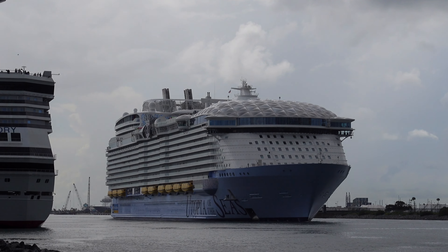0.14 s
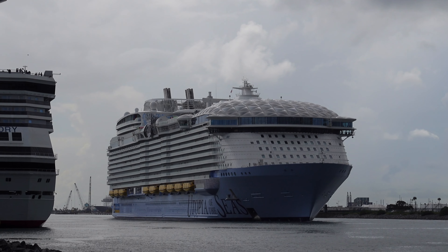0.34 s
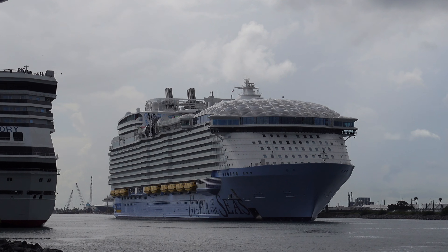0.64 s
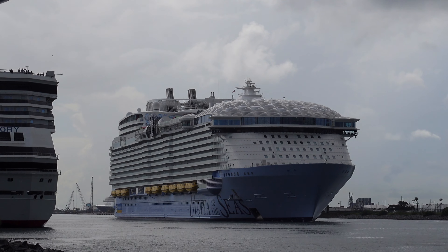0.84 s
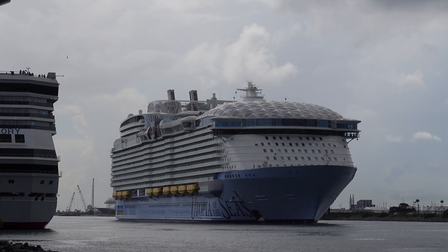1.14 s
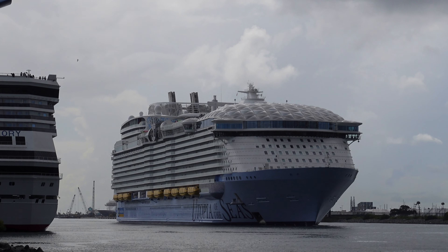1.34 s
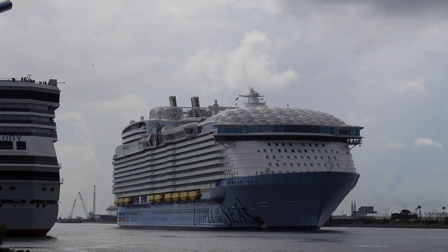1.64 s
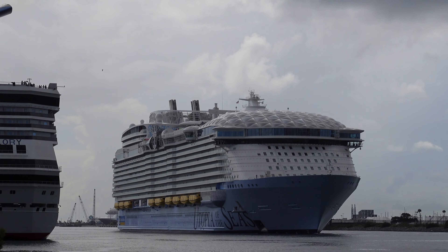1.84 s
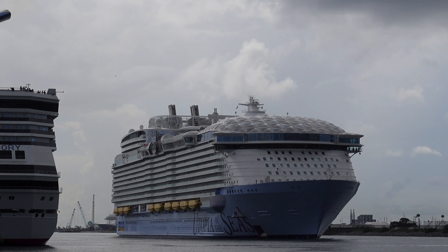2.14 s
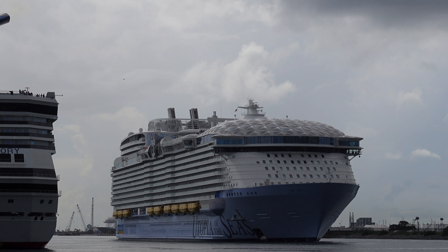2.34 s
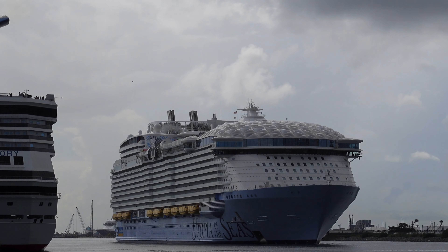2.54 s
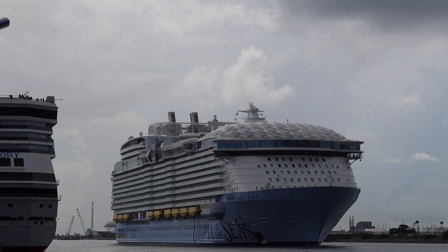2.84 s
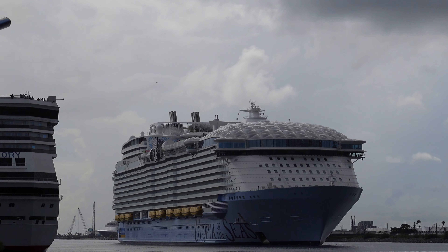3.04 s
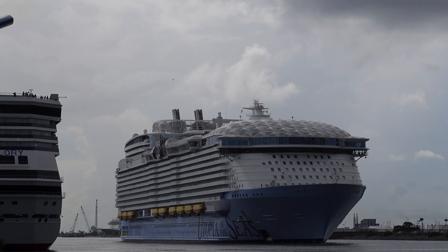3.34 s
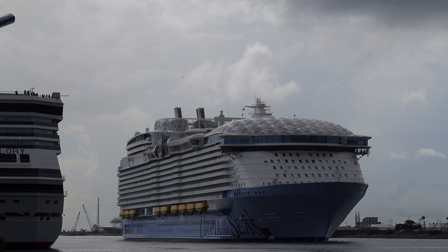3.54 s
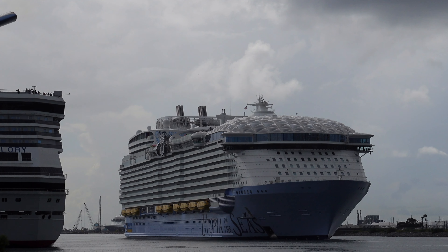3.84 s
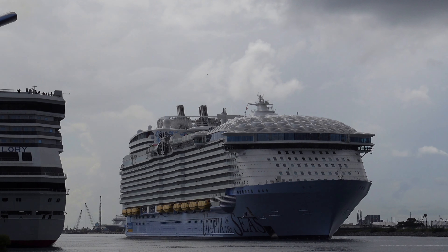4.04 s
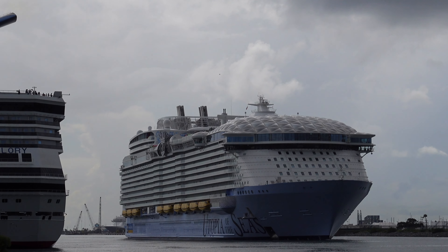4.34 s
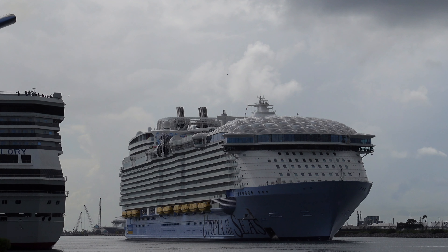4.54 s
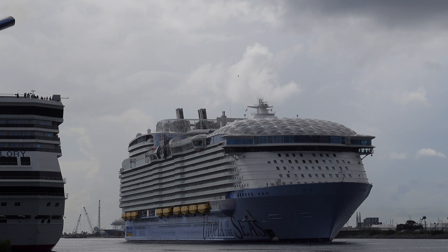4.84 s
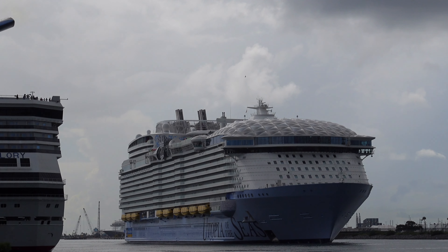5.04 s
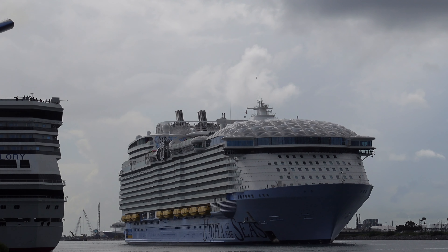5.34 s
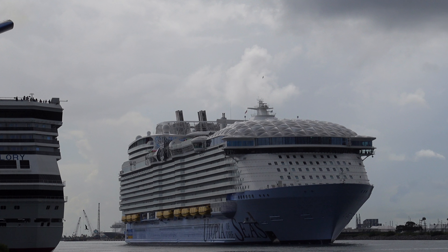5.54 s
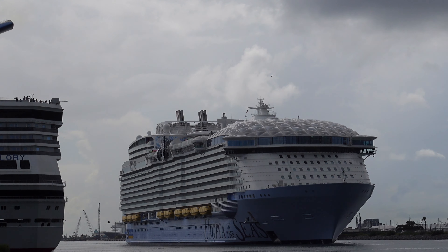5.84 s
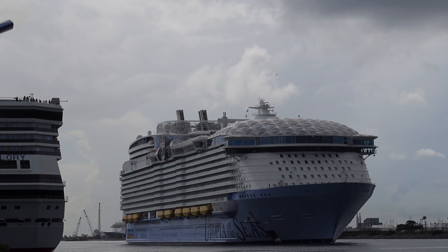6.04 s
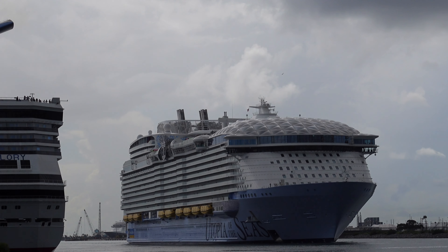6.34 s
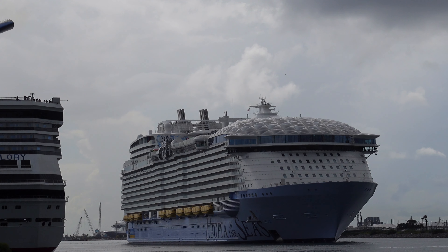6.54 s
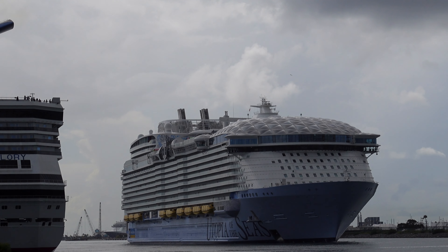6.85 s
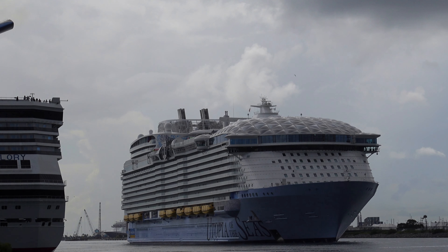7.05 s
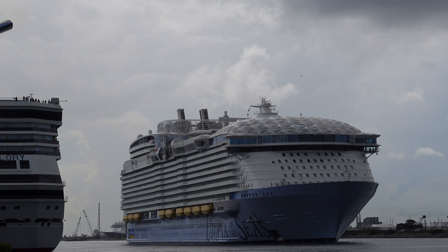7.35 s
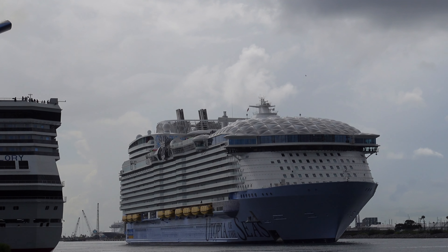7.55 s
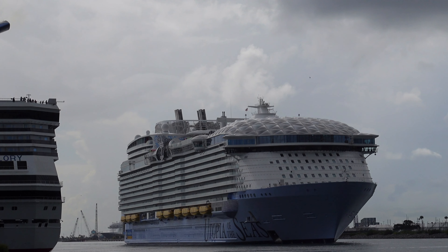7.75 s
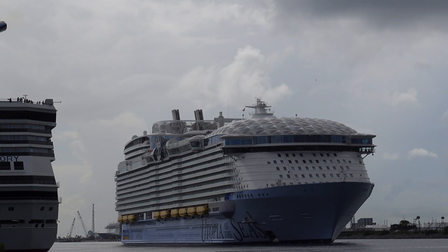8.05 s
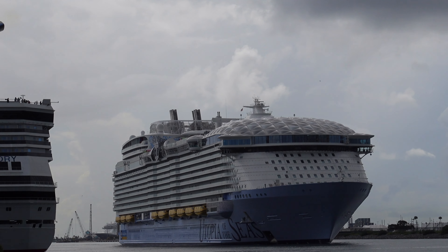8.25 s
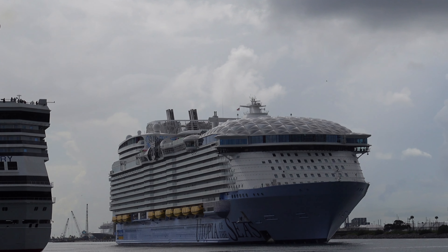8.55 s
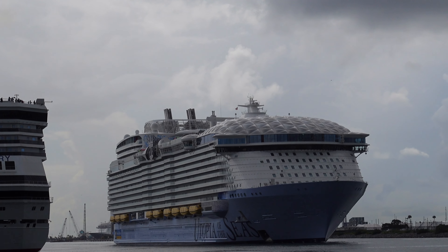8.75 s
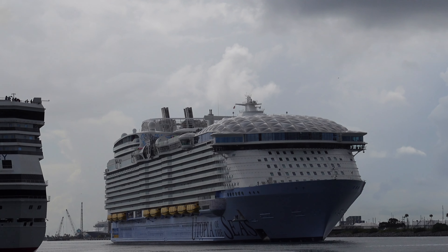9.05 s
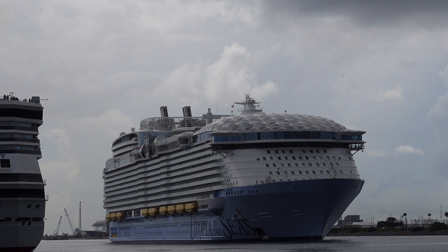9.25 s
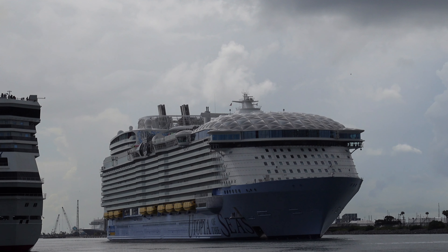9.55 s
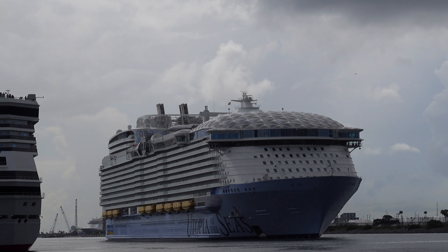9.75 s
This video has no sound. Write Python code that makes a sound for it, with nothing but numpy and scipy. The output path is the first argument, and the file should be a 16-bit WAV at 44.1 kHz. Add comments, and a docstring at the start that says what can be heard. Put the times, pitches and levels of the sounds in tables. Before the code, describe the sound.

Two very long, low, buzzing ship horn blasts roll over a harbour, separated by a short gap of gusty wind rumble and faint ticks.

```python
"""Across a harbour, far from the microphone, a large ship sounds two long blasts on its air horns.
The main horn is a train of shock pulses that arrives over several shifting paths.
A deeper horn and a weak third one sound with it; the deep horn and the main boom breed sum tones.
Air rushes through the horns, hulls and quays echo them, and faint ticks fall between the blasts.
Overload crackles late in the first blast; wind buffets the microphone over a soft harbour noise."""
import sys
import numpy as np
from scipy import signal
from scipy.fft import rfft, irfft, next_fast_len
from scipy.io import wavfile

SR = 44100
rng = np.random.default_rng(int(sys.argv[2]) if len(sys.argv) > 2 else 0)


def to_wav(sig):
    """Store sig (one row per channel, or 1-D mono) as 16-bit WAV at the path in sys.argv[1].

    Samples outside -1..1 are clipped; the rate is SR.
    """
    pcm = np.clip(np.atleast_2d(sig), -1, 1) * 32767
    pcm = np.round(pcm).astype(np.int16)
    wavfile.write(sys.argv[1], SR, pcm.T)  # frames by channels


N = 436590  # samples, about 9.9 s
MAIN_HZ, DEEP_HZ, SMALL_HZ = 91.49, 70.53, 111.8  # pulse rates of the three horns


def from_db(db):
    """Decibels to gain."""
    return 10 ** (np.asarray(db) / 20)


def rms_one(x):
    """Scale to unit power."""
    return x / np.sqrt(np.mean(x ** 2) + 1e-20)


def in_time(rows):
    """Each column of a curve at every sample."""
    s, *columns = np.transpose(rows)
    return [np.interp(np.arange(N) / SR, s, column) for column in columns]


def swings(blasts):
    """How far each level of the blasts lies above or below its mean, in dB."""
    return [db - db.mean() for db in in_time(np.vstack(blasts))]


def at_hz(points, hz):
    """Read a spectrum on a log-frequency axis."""
    points_hz, levels = np.array(points)[:, :2].T
    return np.interp(np.log(hz), np.log(points_hz), levels)


def butter(x, order, hz, kind="low"):
    """Pass x through a Butterworth filter."""
    return signal.sosfilt(signal.butter(order, hz, kind, fs=SR, output="sos"), x)


def drift(rate_hz):
    """Smooth chance with a spread of about 1, never beyond 2.5."""
    step = 40  # samples between drawn points
    pole = np.exp(-2 * np.pi * step * rate_hz / SR)
    white = rng.standard_normal(N // step + 2002)
    slow = signal.lfilter([1], [1, -2 * pole, pole * pole], white)[2000:]  # drop the settling
    bounded = 2.5 * np.tanh(rms_one(slow) / 2.5)
    return np.interp(np.arange(N) / step, np.arange(len(slow)), bounded)


def pulse_harmonics(spectrum, pitch, offset=0, count=100):
    """Complex harmonics of a pulse that strikes at once and then rings (minimum phase)."""
    order = np.arange(count + 1)
    hz = np.maximum(order, .5) * pitch + offset
    # folding the cepstrum onto positive times gives the minimum phase
    cepstrum = irfft(np.log(from_db(at_hz(spectrum, hz))))
    cepstrum[1:count] *= 2
    cepstrum[count + 1:] = 0
    return hz, -np.sqrt(2) * np.exp(rfft(cepstrum)) * (order > 0)


def read_cycle(cycle, turns):
    """Look up a stored cycle at a running count of turns."""
    return cycle[(turns * len(cycle)).astype(np.int64) % len(cycle)]


def play(harmonics, turns, size=32768):
    """Run through one cycle of these harmonics again and again; complex wave."""
    return read_cycle(np.fft.ifft(harmonics, size) * size, turns)


def turns_of(pitch, wander_s, starts=(0,)):
    """Cycles gone by since the blast began; moving air shifts the travel time a little."""
    t = np.arange(N) / SR
    begun = np.where(t < starts[-1] - .5, starts[0], starts[-1])
    return pitch * (t - begun + wander_s * drift(0.65))


def banded_noise(spectrum, likeness, patchy_db):
    """Half-octave bands of stereo noise, each flickering on its own; rms 1."""
    out, edges = 0, 20 * 2 ** np.arange(0, 10, .5)
    white = rng.standard_normal((2, 2, N))
    for k, (low, high) in enumerate(zip(edges, edges[1:])):
        mid, side = butter(white[k % 2], 2, [low, high], "band")
        hz = np.sqrt(low * high)
        alike = np.clip(at_hz(likeness, hz), -1, 1)
        gain = from_db(at_hz(spectrum, hz) + patchy_db * drift(21))
        out = out + gain * (np.sqrt(1 + alike) * mid + np.sqrt(1 - alike) * side * [[1], [-1]])
    return rms_one(out)


def clicks_in_band(rows, low_hz, high_hz):
    """One sharp click for each (time [s], level [dB]), kept to a band."""
    s, db = np.transpose(rows)
    clicks = np.zeros(N)
    clicks[(s * SR).astype(int)] = from_db(db)
    return butter(clicks + 1e-18, 2, [low_hz, high_hz], "band")


# main horn's harmonics before the air carries them: (frequency [Hz], level [dB rms])
MAIN = [(91.5, -45), (183, -27), (274, -27), (458, -27.5), (549, -25.5), (824, -30.5), (1006, -33.5),
        (1464, -41), (2196, -50.5), (3843, -59), (5124, -71.5), (6400, -81), (7300, -95.5), (8300, -116)]
# gain of its five registers as the air carries it, one table per blast:
# (time [s], body [dB], blare [dB], buzz [dB], edge [dB], sizzle [dB])
CARRY = [
    [(0.03, -1, -1.5, 2, 4, 3.5), (0.36, -4, 6, -3.5, 5, 4), (0.7, -4, 5.0, -2.5, -2, 3.5),
     (0.99, 0, 4.0, -2, -2.5, -3), (1.25, 0, -2, 1.5, 0, 5), (1.55, 0, -1.0, -1.5, -9.5, 1.5),
     (1.8, 1.5, 2.5, 1, -2.0, 3), (2.05, 4.5, 5, 0, -9, -2.5), (2.3, 1.5, 3.5, 5.5, 0.5, 5.5),
     (2.55, 2, 9.5, 0, -5, 1), (2.83, -1.5, -1.5, 2, 0, 0.5), (3.1, 0, 0.0, 5.5, 1.5, -8.5),
     (3.3, -0.5, 2, 6, 10, 10.5), (3.55, 2.5, 4, 7, -1, -5), (3.78, 2.5, 2.5, 3, 4, 2),
     (4.04, 2, 0.5, 1.5, -7, 3.5)],
    [(5.46, -4, 0.5, 6, 3.5, -11.0), (5.63, -6, 1, 6.0, 6.5, 6.5), (5.85, -2.5, 5, 2.5, 2.0, 6.5),
     (6.1, 1.0, -1, 1, 2.0, 2.5), (6.35, -1.5, 1.5, -4.5, -2, -1.0), (6.6, -3.5, 1.5, -2.5, 5.0, 8),
     (6.85, -2.5, 1.5, -2, 0, 4.0), (7.1, -4.5, 6.5, -4.0, 0.5, 1), (7.43, -5.0, 3.5, 2.5, -2, 3),
     (7.65, -5, -1, -7, -0.5, -6), (7.93, -7.5, 4, -6.5, -3.5, 2.5), (8.2, -6.5, 2.5, -1, 2, 0.5),
     (8.5, -0.5, -1.0, 0, 4.5, 4.5), (8.8, 1, -3.5, -9.5, -5.5, -4.5), (9.13, -0.5, -7, -1.5, -2.0, 2),
     (9.33, -2.5, -9.5, -3.5, 0, -3.5), (9.55, 6.5, -2.5, -11.0, -1.5, -2.5),
     (9.7, -3, -6.5, -10, -9.5, -4.5), (9.88, -2, -8.5, 1.5, -8, 4)],
]
# centres of those registers: (frequency [Hz])
CARRY_HZ = [380, 860, 1730, 3200, 5200]
# its second harmonic, the boom, one table per blast, before trim and waver: (time [s], level [dB rms])
BOOM = [
    [(0.05, -22), (0.74, -19.5), (2.03, -22), (2.07, -25), (3.25, -25), (4.03, -21)],
    [(5.47, -21.5), (6.47, -18), (7.7, -22.5), (8.46, -18.5), (8.49, -21), (9.1, -24)],
]


def main_horn(turns, deep_turns, valve, horn_db=0.12, shove_s=.00002, flutter_db=2.5, throb_db=1.56,
              boom_db=-0.1, boom_waver_db=-0.1, boom_lag_s=0.0027, brighten=1.7):
    """Shock pulses over several paths; their interference sweeps through the harmonics."""
    hz, harmonics = pulse_harmonics(MAIN, MAIN_HZ)
    # each shock rides on the deep horn's pressure wave, which shifts it and changes its height
    swell = np.sin(2 * np.pi * deep_turns)
    is_boom = np.arange(len(hz)) == 2
    whole = over_water(harmonics * ~is_boom, turns + MAIN_HZ * shove_s * swell)
    # the boom rings on after each shock
    boom_tone = is_boom * harmonics / abs(harmonics[2])
    boom = np.sqrt(2) * play(boom_tone, turns - MAIN_HZ * boom_lag_s).real
    boom_level_db = in_time(np.vstack(BOOM))[0] + boom_db + boom_waver_db * drift(4.0)
    out = boom * valve * from_db(boom_level_db)
    # the paths make the sweeping colour; each register swells and fades on top of that
    size = next_fast_len(N + SR)
    spectrum = rfft(whole, size)
    log_hz = np.log(np.arange(size // 2 + 1) * SR / size + 1)
    for k, level_db in enumerate(in_time(np.vstack(CARRY))):
        share = np.interp(log_hz, np.log(CARRY_HZ), np.eye(len(CARRY_HZ))[k])
        register = irfft(spectrum * share, size)[:N]
        # high harmonics need full pressure, and turbulence shakes them most
        shake_db = np.sqrt(k + 1) * (flutter_db * drift(42) + throb_db * swell) / 2
        out = out + register * valve ** (1 + brighten * k) * from_db(level_db + horn_db + shake_db)
    return out


# later arrivals, off the water and bent by the wind, each open for a moment; negative gain = inverted:
# (middle [s], half length [s], lag [ms], slide [ms per s], gain [ratio])
PATHS = [(0.12, 0.58, 0.45, 0.8, 0.21), (0.33, 0.14, 2.2, -0.83, 0.25), (0.4, 0.79, 0.33, -0.61, -0.2),
         (0.54, 0.9, 3.18, -0.46, 0.11), (0.55, 0.17, 0.65, -0.45, -0.31), (0.58, 0.36, 1.77, -0.55, -0.22),
         (0.59, 0.26, 0.42, -0.28, 0.44), (0.69, 0.85, 1.11, 0.03, -0.13), (0.83, 0.24, 0.91, -0.5, 0.22),
         (0.87, 0.54, 0.59, -0.77, 0.19), (0.93, 0.9, 2.64, -0.58, -0.1), (0.99, 0.43, 0.5, -1.42, -0.12),
         (1.06, 0.71, 1.13, -0.45, -0.16), (1.27, 0.9, 1.6, -0.46, -0.18), (1.45, 0.39, 1.84, -0.99, 0.11),
         (1.57, 0.69, 0.97, 0.26, 0.13), (1.7, 0.68, 1.58, -0.44, 0.19), (1.89, 0.9, 0.16, -1.16, 0.16),
         (1.98, 0.57, 1.3, -1.63, -0.1), (2.06, 0.45, 0.16, -0.87, 0.11), (2.16, 0.42, 0.21, 0.78, -0.21),
         (2.19, 0.54, 0.38, -0.86, -0.11), (2.28, 0.32, 0.78, -0.55, 0.22), (2.31, 0.9, 0.01, 0.59, -0.12),
         (2.5, 0.59, 0.18, 0.77, -0.16), (2.55, 0.59, 0.31, 0.56, -0.11), (2.6, 0.45, 0.41, -0.43, 0.26),
         (2.98, 0.38, 0.43, -0.44, -0.38), (3.82, 0.4, 0.31, 0.31, -0.47), (5.53, 0.53, 0.38, 0.81, 0.58),
         (5.67, 0.26, 0.75, 1.06, 0.31), (5.76, 0.21, 0.42, 0.67, 0.42), (6.07, 0.41, 0.24, 0.57, -0.31),
         (6.14, 0.9, 1.02, 0.64, -0.17), (6.27, 0.9, 1.01, 0.6, -0.16), (6.29, 0.65, 0.7, 0.78, 0.22),
         (6.3, 0.56, 0.66, 0.9, 0.22), (6.42, 0.54, 1.88, 0.47, 0.13), (6.54, 0.53, 3.06, -0.27, 0.12),
         (6.57, 0.38, 2.42, -0.58, -0.14), (6.65, 0.41, 0.62, 0.56, 0.23), (6.68, 0.43, 0.04, -0.8, 0.17),
         (6.72, 0.42, 3.88, -1.16, 0.11), (6.97, 0.86, 3.21, -0.17, -0.12), (7.01, 0.58, 1.91, 0.62, 0.09),
         (7.17, 0.42, 0.77, -0.54, 0.17), (7.2, 0.43, 2.78, -0.87, 0.1), (7.2, 0.39, 1.45, -0.8, 0.14),
         (7.28, 0.48, 1.89, -0.62, 0.15), (7.43, 0.55, 0.24, -0.65, -0.18), (7.47, 0.32, 0.62, 0.33, 0.24),
         (7.61, 0.77, 0.45, 0.65, -0.2), (8.04, 0.86, 0.1, -0.75, -0.12), (8.06, 0.25, 1.6, 0.64, -0.18),
         (8.14, 0.57, 0.17, -0.73, -0.12), (8.26, 0.5, 3.47, 1.32, 0.12), (8.33, 0.53, 0.71, 0.75, 0.19),
         (8.48, 0.7, 0.43, 0.38, 0.23), (8.5, 0.9, 0.41, 0.08, 0.16), (8.61, 0.69, 0.28, 0.86, -0.11),
         (8.62, 0.56, 0.68, 0.29, -0.22), (8.7, 0.5, 1.26, 0.79, 0.13), (8.72, 0.26, -0.09, -0.71, -0.36),
         (8.73, 0.63, 1.12, -0.56, 0.11), (8.81, 0.32, 0.23, -1.27, -0.19),
         (9.19, 0.62, 0.02, -0.25, -0.55), (9.22, 0.66, 2.6, -0.02, -0.12), (9.23, 0.9, 4.36, 0.83, -0.08),
         (9.44, 0.77, 3.94, 1.2, 0.09), (9.48, 0.88, 2.35, 0.72, -0.1), (9.52, 0.34, 0.18, 0.93, -0.22),
         (9.54, 0.78, 0.48, 1.55, -0.11)]
# the wind draws the scattered copies apart: (time [s], factor on their lags [ratio])
SPREAD = [(0.0, 0.796), (0.8, 0.818), (1.5, 0.62), (2.0, 0.34), (2.7, 0.29), (3.3, 0.017), (4.1, 0.18),
          (5.4, 0.19), (5.8, 0.46), (6.2, 0.65), (6.9, 0.755), (7.45, 0.56), (8.2, 0.793), (9.0, 1.17),
          (9.9, 1.32)]


def over_water(harmonics, turns, scatter=0.32, count=8):
    """Direct shock, later arrivals that come, slide and go, and weak treble copies scattered by eddies."""
    t = np.arange(N) / SR
    cycle = np.fft.ifft(harmonics, 32768).real * 32768
    out = read_cycle(cycle, turns)
    for s, half_s, lag_ms, slide, gain in PATHS:
        near = abs(t - s) < 2 * half_s
        since = t[near] - s
        lag_s = (lag_ms + slide * since) / 1000
        fade = np.exp(-(since / half_s) ** 4)
        out[near] += gain * fade * read_cycle(cycle, turns[near] - MAIN_HZ * lag_s)
    spread, = in_time(SPREAD)
    strays = 0
    for lag_s in rng.uniform(0.00052, 0.004496, count):
        strays = strays + drift(2.6) * read_cycle(cycle, turns - MAIN_HZ * lag_s * spread)
    return out + scatter * np.sqrt(abs(spread)) * butter(strays, 1, 2200, "high")


# deep horn's harmonics before its trim and swell: (frequency [Hz], level [dB rms])
DEEP = [(70, -45.5), (141, -29.5), (212, -25), (282, -30.5), (353, -34.5), (423, -38), (494, -37),
        (564, -36.5), (705, -51.5), (1200, -53), (2500, -70.5), (5500, -90.5), (7000, -110)]
# weak third horn's harmonics before its trim: (frequency [Hz], level [dB rms])
SMALL = [(112, -42), (224, -29), (335, -47), (1000, -42.5), (3000, -102), (8000, -125)]
# sum tones of the deep horn and the main horn's boom, before they swell: (frequency [Hz], level [dB rms])
SUMS = [(253, -46.5), (324, -44.5), (465, -39.5), (677, -41), (1030, -45.5), (1600, -56), (3000, -70),
        (5500, -85), (7200, -108)]


def lower_horns(turns, deep_turns, main_valve, valve, deep_db=-1.25, small_db=-5, follow=0.57):
    """The deep horn, a weak third one, and sum tones bred in the overdriven air at the horn mouths."""
    # the low notes swell and fade together on their way over the water
    boom_db, = swings(BOOM)
    deep = play(pulse_harmonics(DEEP, DEEP_HZ)[1], deep_turns).real * from_db(deep_db + follow * boom_db)
    small_turns = turns_of(SMALL_HZ, wander_s=0.00037)
    small = play(pulse_harmonics(SMALL, SMALL_HZ)[1], small_turns).real * from_db(small_db)
    # multiplying by the boom raises every deep harmonic by the boom's frequency
    boom = np.exp(2j * np.pi * 2 * turns)
    sums = (play(pulse_harmonics(SUMS, DEEP_HZ, offset=2 * MAIN_HZ)[1], deep_turns) * boom).real
    carried = from_db(swings(CARRY)[0] / 2)
    horns = deep + small + main_valve * carried * sums
    # they turn bright only under full pressure
    dull = butter(horns, 2, 1100)
    return valve * (dull + main_valve ** 4 * (horns - dull))


# the loudest shocks overload the microphone late in the first blast and crackle faintly,
# before gain and band: (time [s], relative level [dB])
OVERLOADS = [(3.6676, -59), (3.7005, -57), (3.7334, -57), (3.7768, -55), (3.7988, -56), (3.8287, -61),
             (3.8427, -52), (3.897, -55), (3.9734, -57), (4.0173, -56)]


def overload_crackle(turns, crackle_db=22, lesser_db=-35, uneven_db=9):
    """Overload crackle of uneven strength on the shocks, stronger at the listed times."""
    s = np.flatnonzero(np.diff(np.floor(turns)) > 0) / SR  # every beat of the main horn
    s = s[(s > OVERLOADS[0][0]) & (s < OVERLOADS[-1][0])]
    levels_db = lesser_db - crackle_db - uneven_db * rng.exponential(1, N)[:len(s)]
    rows = np.vstack([OVERLOADS, np.transpose([s, levels_db])])
    return from_db(crackle_db) * clicks_in_band(rows, low_hz=5500, high_hz=12000)


# compressed air rushing through the horns: (frequency [Hz], relative level [dB per Hz])
AIR = [(200, -10.5), (700, -8), (1500, 4), (2800, 6), (4500, -6), (6500, -48), (9000, -37), (15000, -56)]


def air_rush(main_valve, deep_valve, air_db=-46.5, follow=0.27, soft_db=9.0, soft_hz=2200):
    """Air rushes softly at part-open valves and hisses once the pressure is full."""
    hiss = banded_noise(AIR, [(200, 0.33), (8000, 0.69)], patchy_db=2.5)
    soft = butter(hiss, 2, soft_hz) * from_db(soft_db)
    full = main_valve ** 4
    edge_db = swings(CARRY)[-2]  # the hiss follows the horn's edge register
    return (full * hiss + (1 - full) * deep_valve ** 2 * soft) * from_db(air_db + follow * edge_db)


def quay_echo(x, count=12, shared=0.46, t60_s=0.4, cut_hz=9500):
    """Dull repeats between hulls and quays, partly different in each ear."""
    size = next_fast_len(N + 2 * SR)
    hz = np.arange(size // 2 + 1) * SR / size
    loops = np.zeros((2, len(hz)), complex)
    for k, lag_s in enumerate(rng.uniform(.03, .11, count)):
        trip = from_db(-60 * lag_s / t60_s) * np.exp(-2j * np.pi * hz * lag_s)
        loops[k % 2] += trip / (1 - trip)  # endless round trips
    loops = (loops + shared * loops[::-1]) / np.hypot(1, shared)
    dulled = loops / (1 + 1j * hz / cut_hz) ** 2
    return irfft(rfft(x, size) * dulled, size)[:, :N] / np.sqrt(2)


# wind on the microphone, a lull and then a freshening breeze: (time [s], relative level [dB])
WIND = [(0, -25), (1.1, -22), (1.9, -27), (2.13, -21), (2.3, -28), (2.8, -42), (3.25, -31.5), (3.85, -36),
        (4.1, -25), (4.45, -31.5), (4.9, -25), (5.05, -28), (5.27, -27.5), (6.1, -19.5), (7.2, -19.5),
        (7.6, -18.5), (8.8, -18.5), (9.9, -20.5)]
# single buffets: (time [s], level over the wind [dB], extra bass [dB], length [s])
BUFFETS = [(1.61, 4, 8, 0.017), (4.024, 7, -8, 0.013), (4.236, 8, -10, .008), (4.276, 8.5, -1, 0.0073),
           (4.573, 3, 6, .007), (4.479, 9, 1, 0.0072), (4.682, 6, -2, 0.0085), (4.797, 10, 7.5, 0.0046),
           (5.007, 5.5, 5, 0.025), (5.126, 4, 14, 0.043), (5.183, -1.5, 11.5, 0.006), (5.367, 6, 4, 0.01),
           (6.89, -8, 9, .015), (9.22, -1.5, 3, 0.017)]
# tone of the wind before filtering: (frequency [Hz], relative level [dB per Hz])
WIND_COLOUR = [(25, -29), (40, -25.5), (70, -5), (110, 4), (190, 3), (300, 0.5), (500, -8), (800, -15.5),
               (1300, -26.5), (2500, -40), (5000, -47.5), (8000, -59.5)]
# how alike the wind is left and right, before the eddies: (frequency [Hz], likeness [-1 to 1])
WIND_LIKENESS = [(30, 0.45), (80, -0.042), (180, -0.099), (400, -0.74), (900, -0.14), (4000, 0.55)]


def wind(gust_db=0.9, gusts_hz=4, lumps_db=0.5, own_db=1.5, rasp_db=-2.0,
         rasp_hz=600, top_hz=1700, thump_hz=110):
    """Short gusts come at random and their eddies hit the microphone ports in lumps; big eddies thump."""
    t = np.arange(N) / SR
    lumps = 2 * np.tanh(drift(43) / 2)
    buffet_db, thump_db = np.zeros((2, N))
    for s, level_db, bass_db, length_s in BUFFETS:
        hump = np.exp(-((t - s) / length_s) ** 2 / 2)
        buffet_db += level_db * hump
        thump_db += bass_db * hump
    noise = butter(banded_noise(WIND_COLOUR, WIND_LIKENESS, patchy_db=2.0), 2, top_hz)
    rasp = butter(noise, 1, rasp_hz, "high")
    noise = noise + rasp * (from_db(rasp_db * lumps) - 1)
    gusts = drift(gusts_hz)
    own = np.array([drift(26), drift(13)])  # each side has eddies of its own
    eddies = from_db(gust_db * gusts + lumps_db * lumps + own_db * own)
    noise = rms_one(noise * eddies)
    thump = butter(noise, 1, thump_hz) * (from_db(thump_db) - 1)
    return (noise + thump) * from_db(in_time(WIND)[0] + buffet_db)


# faint ticks between the blasts, before the band filter: (time [s], level [dB])
TICKS = [(4.447, -38), (5.013, -33), (5.184, -29)]


def faint_ticks():
    """Single clicks kept to a narrow treble band."""
    return clicks_in_band(TICKS, low_hz=3300, high_hz=5000)


# far harbour noise: (frequency [Hz], relative level [dB per Hz])
HARBOUR = [(30, -3.5), (100, 0.5), (400, -2.5), (1000, -13.5), (2000, -25.5), (4500, -36.5), (7000, -52),
           (10000, -54), (15000, -54)]


def harbour_noise(level_db=-46):
    """Soft far noise, mostly low, more alike left and right in the bass than in the treble."""
    return from_db(level_db) * banded_noise(HARBOUR, [(100, 0.79), (5000, 0.14)], patchy_db=0.5)


# each blast starts its horns afresh: (first beat of main horn [s], first beat of deep horn [s])
STARTS = [(0.0069, 0.0098), (5.3776, 5.3621)]
# air valves: (time [s], main horn opening [0-1], deep horn opening [0-1])
VALVES = [(0, 1, 1), (4.054, 1, 0.89), (4.064, 0.3, 0.8), (4.075, 0.22, 0.5), (4.16, 0.01, 0.05),
          (5.325, 0, 0.04), (5.395, 0.2, 0.78), (5.418, 0.77, 0.7), (5.434, 0.97, 1), (5.447, 0.99, 0.7),
          (5.5, 1, 0.81), (9.9, 0.99, 0.48)]


def scene(echo_db=-12):
    """Horns far off and nearly straight ahead, their echo, the harbour, and wind at the microphone."""
    main_starts, deep_starts = np.transpose(STARTS)
    main_valve, deep_valve = np.clip(in_time(VALVES), 0, 1)
    turns = turns_of(MAIN_HZ, 0.00018, main_starts)
    deep_turns = turns_of(DEEP_HZ, 0.0003, deep_starts)
    horns = main_horn(turns, deep_turns, main_valve)
    horns = horns + lower_horns(turns, deep_turns, main_valve, deep_valve) + overload_crackle(turns)
    background = harbour_noise() + faint_ticks()
    echo = from_db(echo_db) * quay_echo(horns)
    # left and right gains in dB: horns a touch to the right, wind stronger on the left
    ship = horns * from_db([[-.45], [.45]]) + air_rush(main_valve, deep_valve)
    gusts = wind() * from_db([[1.2], [-1.2]])
    return ship + echo + background + gusts


def record(dry, dull_hz=8200, smear_hz=900, cutoff_hz=15500):
    """The microphone smears each shock a little; the highest peaks are rounded and the top is cut."""
    pole = np.exp(-2 * np.pi * smear_hz / SR)
    smeared = signal.lfilter([-pole, 1], [1, -pole], dry)  # all-pass: turns phase only
    rounded = smeared / (1 + (smeared / 1.2) ** 6) ** (1 / 6)
    dull = butter(rounded, 2, dull_hz)
    return signal.sosfilt(signal.cheby2(12, 70, cutoff_hz, fs=SR, output="sos"), dull)


dry = scene()
out = record(dry)
to_wav(out)
```